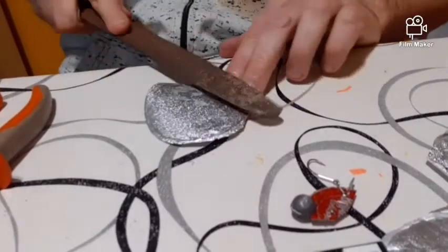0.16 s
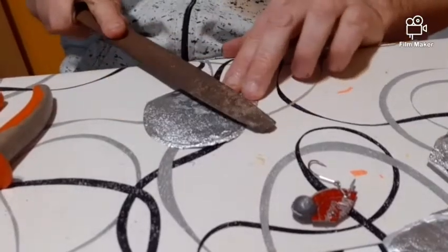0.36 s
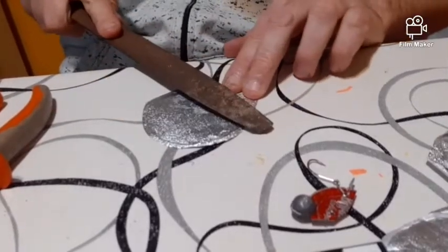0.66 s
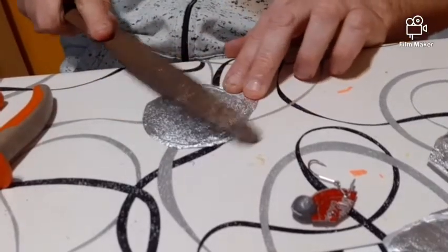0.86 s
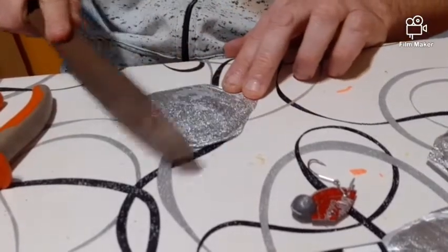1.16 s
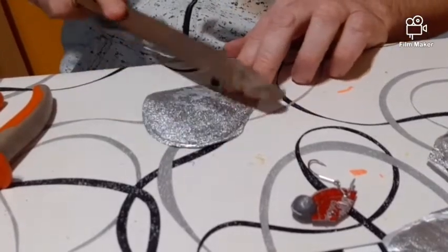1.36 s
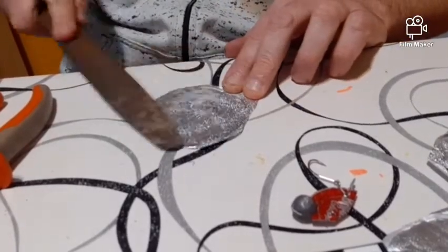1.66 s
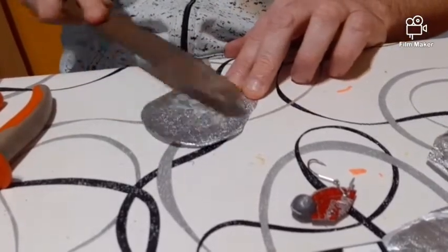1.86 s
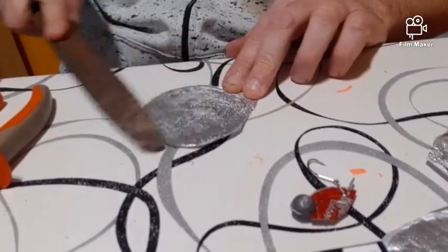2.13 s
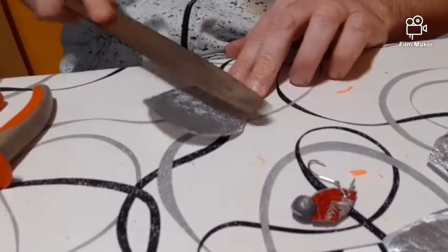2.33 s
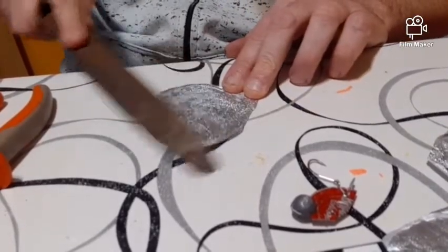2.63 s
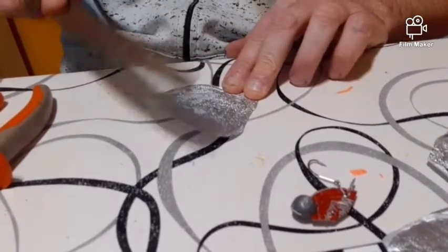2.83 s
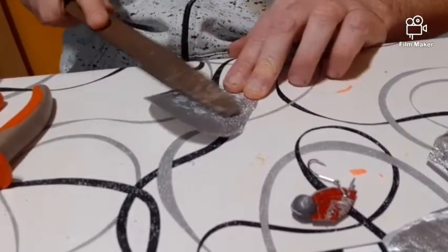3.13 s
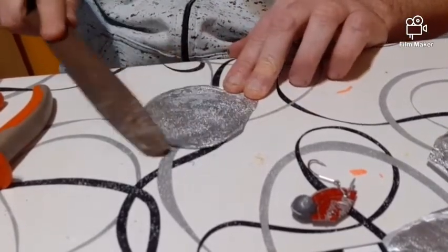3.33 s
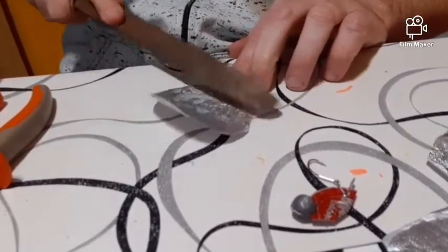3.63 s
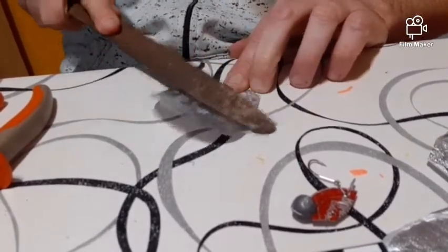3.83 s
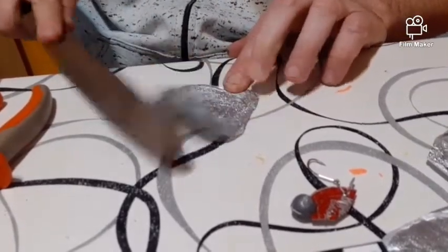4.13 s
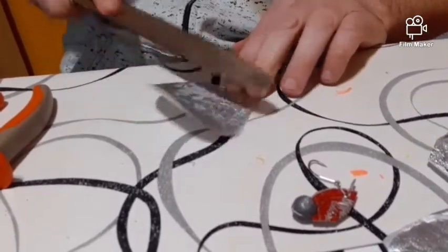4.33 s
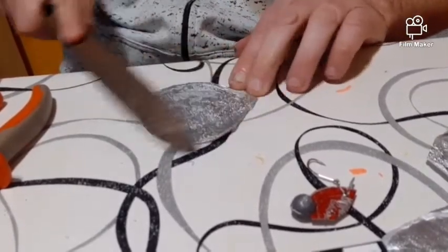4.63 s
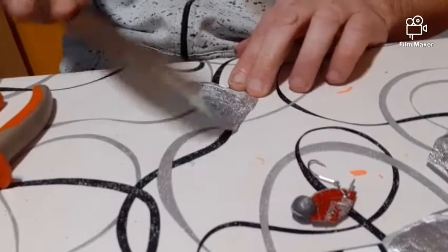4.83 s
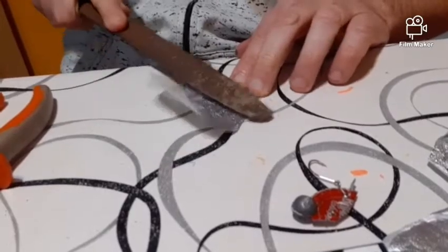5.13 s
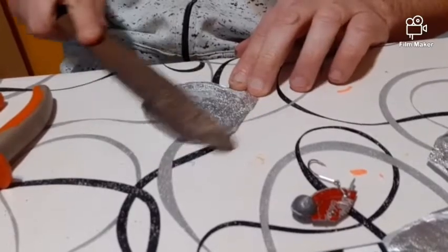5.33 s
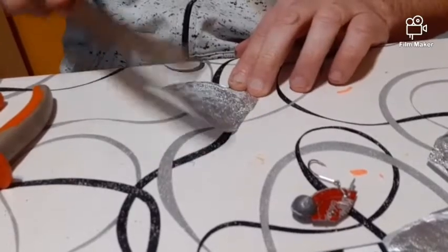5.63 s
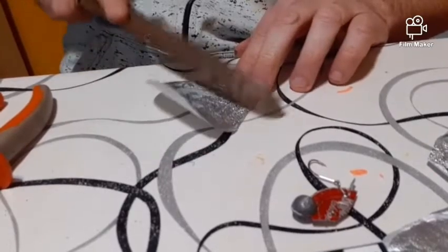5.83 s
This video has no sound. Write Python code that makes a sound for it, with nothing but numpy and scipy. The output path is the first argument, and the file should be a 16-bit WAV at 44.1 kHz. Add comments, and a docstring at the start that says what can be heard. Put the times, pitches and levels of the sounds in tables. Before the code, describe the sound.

Close, repeated rasps of a flat blade smoothing creased foil on a table, mixed with soft knocks and small clicks.

```python
"""Steel blade smoothing a foil lid.

A flat blade strokes a foil lid on a table, close by in a small room. It lands with a thud of
the table top, hisses over the tiny creases, then ticks and snags at the rim as it lifts off.
Blows on the table rattle the blade, the pressed lid groans, and once the blade judders.
Under it all the table murmurs beneath the hands."""
import sys
import numpy as np
from scipy import signal
from scipy.io import wavfile
from scipy.ndimage import map_coordinates

SR = 44100
rng = np.random.default_rng(int(sys.argv[2]) if len(sys.argv) > 2 else 0)


def put_to_file(sound):
    """Save the sound as 16-bit audio at rate SR, in the file named by the first command-line argument."""
    columns = np.atleast_2d(sound).T  # one column per channel
    safe = np.clip(columns, -1, 1)
    whole_steps = np.round(safe * 32767)
    wavfile.write(sys.argv[1], SR, whole_steps.astype(np.int16))


N = 263982
TIME_S = np.arange(N) / SR

# Event levels are relative; rise_s, fall_s and decay_s are 1/e times.
# table murmur spectrum: freq_hz, gain_db
MURMUR_SPECTRUM = [(20, -34.5), (45, -15.5), (62, -15), (90, -6), (130, 1), (175, -8.5), (260, -7),
                   (370, -14), (600, -25), (1000, -33.5), (2000, -51), (16000, -91.5)]
# rim catches, tightens, snaps free: snap_s, level_db, treble_db, rise_s
RIM_SNAGS = [(0.083, -54, 8, 0.0075), (0.323, -43, -1.5, 0.0066), (1.221, -38, 0, 0.0074),
             (2.336, -48.5, 9, .006), (3.489, -45.5, 9.5, 0.0046), (3.498, -45.5, 8.5, 0.0017),
             (4.229, -43, 13.5, 0.0096), (4.864, -43.5, 6.5, 0.0066), (4.96, -42.5, 2, 0.0033),
             (4.978, -35.5, 9.5, 0.0063), (5.6328, -35.5, 12.5, 0.0043), (5.651, -48, 0, 0.0038)]
# edge clicks over the rim: start_s, level_db, treble_db
RIM_TICKS = [(0.305, -41, 14), (0.709, -60.5, 2), (1.122, -32.5, -18), (1.196, -32.5, -2), (1.826, -56, 11),
             (2.297, -30, -12), (2.31, -32.5, 3), (2.85, -43, 13), (3.51, -25.5, -22), (3.579, -40.5, 4),
             (3.607, -40.5, 2), (4.1848, -29, 0.5), (4.221, -38, 5), (4.23, -31, -25), (4.28, -46, 7),
             (4.385, -57, 4.5), (4.423, -51.5, 4), (4.874, -24, -5), (5.131, -55.5, -0.5)]
# foil rim spectrum: freq_hz, gain_db
RIM_SPECTRUM = [(300, -23), (900, -2.5), (1400, -0.5), (1800, 0), (2400, 3), (3100, -3.5), (3750, -3.5),
                (4400, 1), (5400, 2), (6800, 4), (8700, -4.5), (11500, -0.5), (16000, -11.5)]
# blade lands edge first: start_s, tick_db, treble_db, thud_db, brightness_hz
BLADE_LANDINGS = [(0.229, -49, -7.5, -41.5, 103), (1.573, -31, -0.5, -24.5, 115),
                  (2.018, -37.5, 6.5, -17.5, 214), (2.483, -42.5, 10, -25.5, 118),
                  (3.156, -41.5, 10, -32.5, 113), (3.826, -43.5, 12.5, -30, 93),
                  (5.231, -43.5, 11, -39, 105), (5.963, -35, 5.5, -26.5, 128)]
# blade brushes the lid on its way off or back: crest_s, level_db, treble_db, rise_s
BLADE_BRUSHES = [(0.085, -56, 7, 0.026), (0.318, -50.5, -4.5, 0.028), (1.203, -50.5, 9, 0.042),
                 (2.305, -55.5, 7, 0.019), (4.965, -51.5, -3, .016), (5.57, -56.5, -10, 0.079)]
# strokes over the foil: start_s, length_s, to_crest_s, rise_s, fall_s, level_db,
# glide_db (re crest), treble_db, sparkle_db (re treble), treble_lead_s, weight_db
BLADE_STROKES = [ (0.923, 0.16, 0.097, 0.063, 0.042, -43, -29, 3, 0, 0.003, -43.5),
                 (1.573, 0.2, 0.14, 0.044, 0.053, -40, -8.5, 0.5, 5, 0.0055, -48),
                 (2.012, 0.25, 0.16, 0.069, 0.074, -41.5, -18, 5, 1.5, 0.015, -42.5),
                 (2.48, .33, 0.23, .05, 0.052, -42.5, -10.5, 1.5, 1.5, .004, -45),
                 (3.155, 0.38, 0.19, 0.068, 0.06, -39, -22.5, 4, -1, 0.037, -43),
                 (3.827, 0.375, .21, 0.073, 0.086, -43, -26, 4.5, 1, 0.02, -41),
                 (4.512, 0.32, 0.21, 0.1, 0.059, -40.5, -14, 7, 0, 0.029, -41),
                 (5.234, 0.41, .19, 0.068, 0.072, -46.5, -11, 6, 1, .028, -41), ]
# creased foil spectrum: freq_hz, gain_db
FOIL_SPECTRUM = [(300, -16), (650, -4), (950, -3), (1500, -5.5), (2100, -6.5), (3100, -6), (4100, -7.5),
                 (5000, -8.5), (6000, -5), (7400, -6.5), (8600, -12), (10700, -8), (12800, -7.5),
                 (16000, -12)]
# lid pinned under the blade: freq_hz, width_hz, level_db
LID_RESONANCES = [(1890, 700, -1.5), (2490, 410, 0), (3030, 350, -4.5), (3800, 780, -1)]
# table top modes: freq_hz, level_db, t60_s
TABLE_MODES = [(63, -9, 0.61), (95.3, -5, 0.6), (102.44, -3.5, 0.55), (121, -4, 0.32), (151, -8.5, 0.11),
               (173.6, -6.5, 0.29), (234, -5, 0.15), (259.8, -6, 0.42), (275.4, -2.5, 0.31),
               (320, -16.5, 0.65), (363.5, -9.5, 0.18), (421, -9.5, 0.092), (468.2, -5, 0.12),
               (504, -9, 0.11), (648.5, -13, 0.18), (702, -9, 0.096), (806, -3.5, 0.04)]
# free modes of the blade: freq_hz, level_db, t60_s
STEEL_MODES = [(768, 1, 1), (1087, -13.5, 0.92), (1834, -5.5, 0.82), (2430, 11, 0.14), (3610, 19, 0.12)]
# hands bump or lean on the table, and a hard rim tick knocks it: start_s, level_db, brightness_hz
TABLE_KNOCKS = [(0.33, -31.5, 96), (1.036, -35, 180), (1.489, -25, 115), (2.535, -34, 122),
                (2.877, -39.5, 700), (2.887, -41, 710), (3.509, -44.5, 600), (3.6, -44.5, 124),
                (3.757, -34, 95), (4.281, -36, 121), (4.492, -37.5, 100), (5.137, -38.5, 90)]
# blade rattling on the lid: freq_hz, width_hz, level_db
RATTLE_RESONANCES = [(1450, 500, -2), (2420, 190, -1.5)]
# pressed lid groans on the table: crest_s, level_db, pitch_hz, glide_oct_per_s
LID_GROANS = [(2.085, -38.5, 290, -3.5), (2.595, -41, 335, -8.5), (4.458, -44.5, 299, 4)]
# juddering blade: freq_hz, width_hz, level_db
JUDDER_RESONANCES = [(710, 100, -6), (815, 480, -4), (1864, 170, -0.5), (2270, 600, -5.5),
                     (2520, 200, -5.5)]
# room decay: freq_hz, t60_s
ROOM_DECAY = [(100, 0.16), (500, 0.5), (2000, 0.29), (6500, 0.3), (10000, 0.21), (16000, 0.31)]
# microphone ports, left minus right: freq_hz, gain_db
PORT_BALANCE = [(100, -1.5), (500, -0.5), (1200, -2), (3000, -1.5), (4500, 1.5), (5400, -5), (6600, 0.5),
                (7500, -6.5), (8300, 4), (10300, 5.5), (12000, -2), (15500, -1.5)]


def gain_of(db):
    return 10 ** (np.asarray(db) / 20)


def unit_rms(x):
    return x / np.sqrt(np.mean(x ** 2) + 1e-20)


def curve_at(points, hz):
    freq_hz, value = np.transpose(points)
    return np.interp(np.log(hz + 1), np.log(freq_hz + 1), value)


def band(x, hz, kind, order=2):
    return signal.sosfilt(signal.butter(order, hz, kind, fs=SR, output="sos"), x)


def convolve(x, taps):
    return signal.oaconvolve(np.atleast_2d(x), np.atleast_2d(taps), axes=1)[:, :N]


def colour(x, spectrum):
    """Minimum-phase filter with the given spectrum."""
    log_gain = np.log(gain_of(curve_at(spectrum, abs(np.fft.fftfreq(4096, 1 / SR)))))
    taps = np.fft.ifft(np.exp(np.conj(signal.hilbert(log_gain)))).real
    return convolve(x, taps).reshape(x.shape)


def ringing(modes):
    """Impulse response of a body with these modes."""
    t = np.arange(SR) / SR
    return sum(gain_of(db - 60 * t / t60_s) * np.sin(2 * np.pi * hz * t) for hz, db, t60_s in modes)


def resonate(x, resonances):
    """Broad parallel resonances, unit RMS in sum."""
    peaks = (gain_of(db) * unit_rms(signal.lfilter(*signal.iirpeak(hz, hz / width_hz, SR), x))
             for hz, width_hz, db in resonances)
    return unit_rms(sum(peaks))


def wander(rate_hz):
    """Random curve of about unit size."""
    return np.interp(TIME_S * rate_hz, np.arange(N // 10), rng.standard_normal(N // 10))


def swell(crest_s, rise_s, fall_s, roundness=1.75):
    """Envelope of a push: builds to a rounded crest, lets go."""
    age_s = TIME_S - crest_s
    return np.exp(-abs(age_s / np.where(age_s < 0, rise_s, fall_s)) ** roundness)


def burst(grain, envelope):
    """Enveloped stereo grain; mean channel energy equals the envelope's."""
    return envelope * grain * np.sqrt(np.sum(envelope ** 2) / np.sum(envelope ** 2 * grain ** 2) * 2)


def murmur(rest_db=-56.5, push_db=-48, spread=0.32, hiss_db=-78):
    """The table rumbles under the hands, more with each stroke; faint steady hiss."""
    shared, *own = (unit_rms(colour(rng.standard_normal(N), MURMUR_SPECTRUM)) for _ in range(3))
    pushes = sum(swell(start_s + to_crest_s, rise_s=0.11, fall_s=0.16)
                 for start_s, _, to_crest_s, *_ in BLADE_STROKES)
    hands = gain_of(rest_db) + gain_of(push_db) * pushes
    return hands * (shared + spread * np.array(own)) + gain_of(hiss_db) * rng.standard_normal((2, N))


def creases(slips_per_s, spread_db, clump_db, clump_hz, friction, coherence=0.27):
    """Tiny uneven slips over smooth friction, bunched at wrinkles; partly shared by the channels."""
    sizes = gain_of(spread_db * np.minimum(rng.exponential(1, N), 4))
    slips = unit_rms(sizes * (rng.random(N) < slips_per_s / SR))
    shared, *own = slips * rng.choice([-1, 1], (3, N)) + friction * rng.standard_normal((3, N))
    pair = np.sqrt(coherence) * shared + np.sqrt(1 - coherence) * np.array(own)
    return unit_rms(pair * gain_of(clump_db * wander(clump_hz)))


def radiate(drive, spectrum, split_hz):
    """Foil rasp below the split, fizz above; unit RMS each."""
    x = colour(drive, spectrum)
    return unit_rms(band(x, split_hz, "low", order=4)), unit_rms(band(x, split_hz, "high", order=4))


def rim(tick_db=-1, tick_decay_s=0.0034, landing_decay_s=0.0091, snap_s=0.0032,
        lead_in_db=-20, lead_in_s=0.0052):
    """Edge on the foil rim: ticks, each after a faint, short lead-in of noise; snags swell and snap."""
    drive = creases(slips_per_s=5000, spread_db=1, clump_db=3, clump_hz=800,
                    friction=0.99, coherence=0.46)
    rasp, fizz = radiate(drive, RIM_SPECTRUM, split_hz=3720)
    out = np.zeros((2, N))
    ticks = [(*row, tick_decay_s) for row in RIM_TICKS]
    ticks += [(*row[:3], landing_decay_s) for row in BLADE_LANDINGS]
    for at_s, level_db, treble_db, decay_s in ticks:
        near = abs(TIME_S - at_s) < 0.08
        age_s, treble = TIME_S[near] - at_s, gain_of(treble_db)
        lead_in = gain_of(lead_in_db) * np.exp(-abs(age_s) / lead_in_s)
        envelope = np.where(age_s < 0, lead_in, np.exp(-abs(age_s) / decay_s))
        tick = burst(rasp[:, near], envelope) + treble * burst(fizz[:, near], envelope)
        out[:, near] += gain_of(level_db + tick_db) * tick / np.hypot(1, treble)
    for at_s, level_db, treble_db, rise_s in RIM_SNAGS:
        near = abs(TIME_S - at_s) < 0.08
        age_s = TIME_S[near] - at_s
        envelope = np.exp(-abs(age_s) / np.where(age_s < 0, rise_s, snap_s))
        snag = burst(rasp[:, near], envelope) + gain_of(treble_db) * burst(fizz[:, near], envelope)
        out[:, near] += gain_of(level_db) * snag
    return out


def contact(touch_s=0.017, lift_s=0.025, weight_lag_s=0.011):
    """Blade envelopes. Per stroke, speed and sparkle crest first, then grip, then arm weight."""
    grip, speed, sparkle, weight = np.zeros((4, N))
    for (start_s, length_s, to_crest_s, rise_s, fall_s, level_db,
         glide_db, treble_db, sparkle_db, lead_s, weight_db) in BLADE_STROKES:
        down = np.clip((TIME_S - start_s) / touch_s, 0, 1)
        down *= np.clip((start_s + length_s - TIME_S) / lift_s + 0.5, 0, 1)
        crest_s = start_s + to_crest_s
        # a light glide floors each swell: bright, spares the table
        sweep = down * np.hypot(swell(crest_s - lead_s, rise_s, fall_s), gain_of(glide_db + 1))
        press = down * np.hypot(swell(crest_s, rise_s, fall_s), gain_of(glide_db))
        lean = down * np.hypot(swell(crest_s + weight_lag_s, rise_s, fall_s), gain_of(glide_db - 4.5))
        grip += gain_of(level_db) * press
        speed += gain_of(level_db + treble_db) * sweep
        sparkle += gain_of(level_db + treble_db + sparkle_db) * sweep
        weight += gain_of(weight_db) * lean
    for crest_s, level_db, treble_db, rise_s in BLADE_BRUSHES:
        brush = gain_of(level_db) * swell(crest_s, rise_s, fall_s=0.022)
        grip += brush
        speed += gain_of(treble_db) * brush
        sparkle += gain_of(treble_db + 1) * brush
        weight += gain_of(-3.5) * brush
    return grip, speed, sparkle, weight


def drift(x, depth_db, rate_hz):
    """Broad bands come and go as the contact slides over the foil."""
    hz, t, spectra = signal.stft(x, SR, nperseg=512)
    grid = np.meshgrid(np.log2(1 + hz / 400) * 3, t * rate_hz, indexing="ij")
    field = map_coordinates(rng.standard_normal((32, 256)), grid, order=1, mode="mirror")
    return signal.istft(spectra * gain_of(depth_db * field), SR, nperseg=512)[1][:, :N]


def scrape(sparkle_hz=10500, rasp_db=-2, grit_db=-3, hiss_db=-1, table_db=-0.5):
    """Creases rasp under the edge, coarse ones ring the lid; speed adds hiss, weight shakes the table."""
    fine = creases(slips_per_s=3000, spread_db=3.5, clump_db=1.6, clump_hz=200, friction=0.65)
    rasp, fizz = radiate(drift(fine, depth_db=4.5, rate_hz=14), FOIL_SPECTRUM, split_hz=3280)
    coarse = creases(slips_per_s=1100, spread_db=3, clump_db=1.8, clump_hz=150, friction=0.35)
    lid = resonate(drift(coarse, depth_db=2.5, rate_hz=15), LID_RESONANCES)
    grit = unit_rms(band(lid, [1400, 4600], "band"))
    grip, speed, sparkle, weight = contact()
    crunch = grip * (gain_of(rasp_db) * rasp + gain_of(grit_db) * grit)
    hiss = speed * band(fizz, sparkle_hz, "low", order=5)
    hiss += sparkle * band(fizz, sparkle_hz, "high", order=5)
    ring = band(convolve(fine.mean(0), ringing(TABLE_MODES)), 260, "high", order=3)
    table = unit_rms(unit_rms(ring) + unit_rms(band(fine, [280, 620], "band")))
    return crunch + gain_of(hiss_db) * hiss + gain_of(table_db) * weight * table


def steel_ring(drive, ring_db=-25):
    """Every slip leaves the blade ringing faintly."""
    ring = ringing(STEEL_MODES)
    return gain_of(ring_db) * convolve(drive, ring / np.linalg.norm(ring))


def blows(delay_s=0.00454):
    """Knocks on the table, plus a blow just after each landing: start_s, level_db, brightness_hz."""
    return TABLE_KNOCKS + [(start_s + delay_s, db, hz) for start_s, _, _, db, hz in BLADE_LANDINGS]


def thuds(boost_db=3):
    """Each blow rings the table; a short, hard one reaches higher modes and spares the lowest."""
    out, ring = np.zeros(N), ringing(TABLE_MODES)
    for start_s, level_db, brightness_hz in blows():
        thud = band(ring, 2.1 * brightness_hz, "low", order=3)
        thud = band(thud, max(0.45 * brightness_hz, 50), "high", order=3)
        span = out[round(start_s * SR):][:len(thud)]
        span += gain_of(level_db + boost_db) * thud[:len(span)] / abs(thud).max()
    return out


def rattle(rattle_db=-36, decay_s=0.066):
    """Each blow leaves the blade buzzing faintly against the lid."""
    shake = sum(gain_of(db + rattle_db) * (TIME_S > start_s) * np.exp(-abs(TIME_S - start_s) / decay_s)
                for start_s, db, _ in blows())
    buzz = resonate(rng.standard_normal((2, N)), RATTLE_RESONANCES)
    return shake * unit_rms(band(buzz, [900, 3200], "band"))


def groans(waver=0.06, overtone_db=-14):
    """Quick, near-regular stick-slip of lid on table: a short, low, sliding tone."""
    out = np.zeros(N)
    for crest_s, level_db, pitch_hz, glide_oct_per_s in LID_GROANS:
        glide_oct = np.clip(glide_oct_per_s * (TIME_S - crest_s), -1, 1)
        freq_hz = pitch_hz * 2 ** glide_oct * (1 + waver * wander(rate_hz=150))
        phase = 2 * np.pi * np.cumsum(freq_hz) / SR
        tone = unit_rms(np.sin(phase) + gain_of(overtone_db) * np.sin(2 * phase))
        out += gain_of(level_db) * swell(crest_s, rise_s=0.019, fall_s=0.027) * tone
    return out


def judder(level_db=-35.5, rasp_db=-17):
    """Dragged flat, the blade rings with coarse stick-slip; thin rasp above."""
    drive = creases(slips_per_s=1100, spread_db=1.5, clump_db=3, clump_hz=230, friction=0.89)
    ring = unit_rms(band(resonate(drive, JUDDER_RESONANCES), 2760, "low", order=6))
    rasp = unit_rms(band(drive, [4300, 6200], "band"))
    envelope = swell(crest_s=4.506, rise_s=0.025, fall_s=0.071)
    return gain_of(level_db) * envelope * (ring + gain_of(rasp_db) * rasp)


def reflections(x, predelay_s=0.006, taps_per_s=6000):
    """Sparse echoes, a set per microphone; each band dies at its own rate."""
    taps = rng.choice([-1., 1.], (2, SR // 2)) * (rng.random((2, SR // 2)) < taps_per_s / SR)
    hz, t, spectra = signal.stft(taps, SR, nperseg=128)
    decay = gain_of(-60 * t / curve_at(ROOM_DECAY, hz)[:, None])
    tail = signal.istft(spectra * decay, SR, nperseg=128)[1]
    tail /= np.linalg.norm(tail, axis=1, keepdims=True)
    return convolve(x, np.pad(tail, ((0, 0), (round(predelay_s * SR), 0))))


def room(x, sets=5, fade_s=0.05):
    """The hands move, so each set of reflections fades into the next, in a cycle."""
    offsets = TIME_S / fade_s - np.arange(sets)[:, None]
    distances = abs((offsets + sets / 2) % sets - sets / 2)
    fades = np.cos(np.pi / 2 * np.minimum(distances, 1))
    return sum(reflections(x * fade) for fade in fades)


def scene(foil_send_db=-8, table_send_db=-13, right_lag_samples=4):
    """Foil and table in a small room; direct sound reaches the right microphone later."""
    foil = scrape() + rim() + judder() + rattle()
    foil += steel_ring(foil)
    table = thuds() + groans()
    left, right = foil + table
    direct = np.array([left, np.pad(right, (right_lag_samples, 0))[:N]])
    return direct + room(gain_of(foil_send_db) * foil + gain_of(table_send_db) * table) + murmur()


def record(dry, low_cut_hz=53, high_cut_hz=15900):
    """Colour of each microphone port, low cut, band limit."""
    ports = np.array([colour(x, [(hz, side * db / 2) for hz, db in PORT_BALANCE])
                      for x, side in zip(dry, (1, -1))])
    ports = band(ports, low_cut_hz, "high", order=4)
    lowpass = signal.firwin(511, high_cut_hz, window=("kaiser", 9), fs=SR)
    return signal.oaconvolve(ports, lowpass[None], "same", axes=1)


dry = scene()
out = record(dry)
put_to_file(out)
```